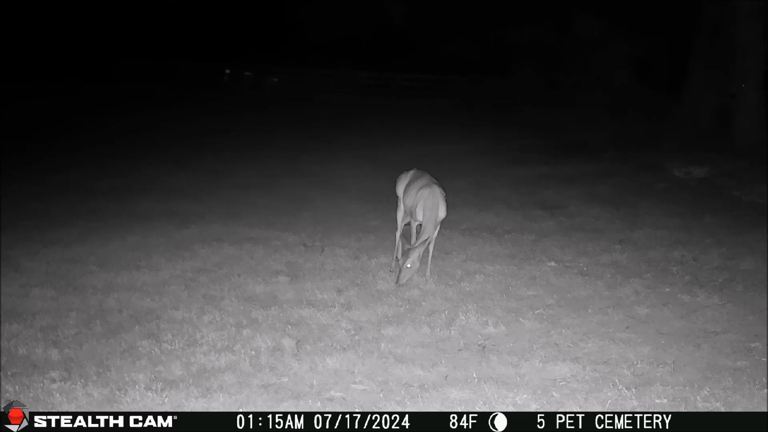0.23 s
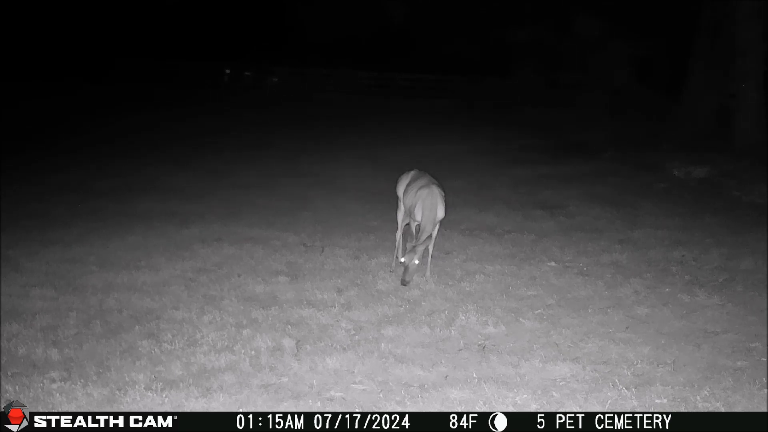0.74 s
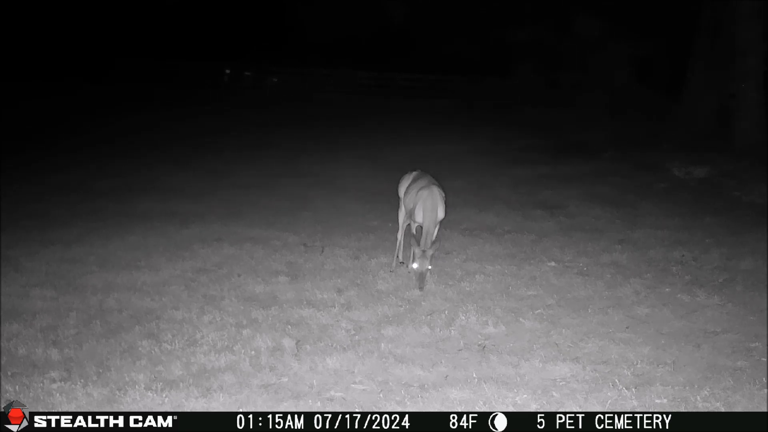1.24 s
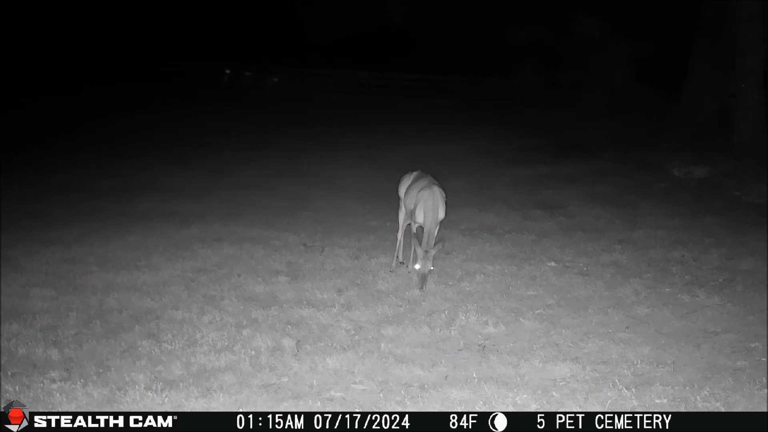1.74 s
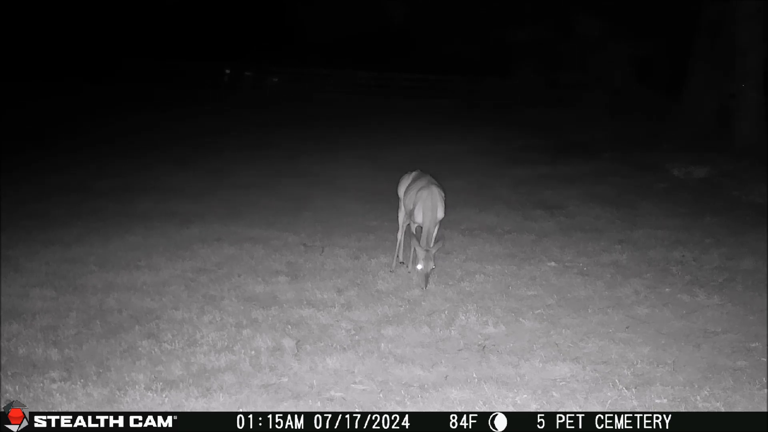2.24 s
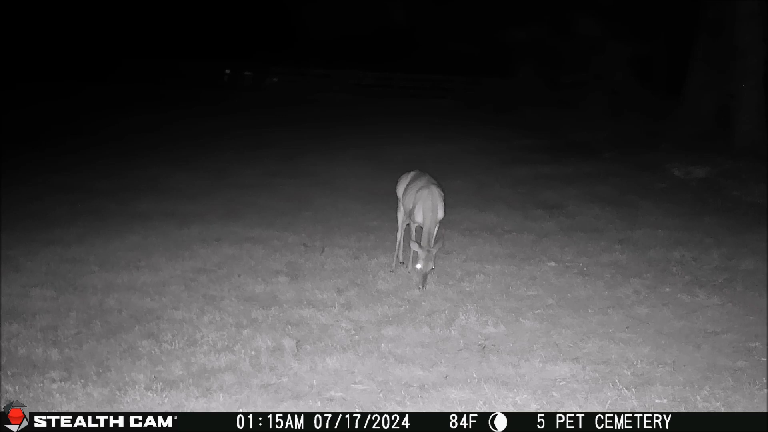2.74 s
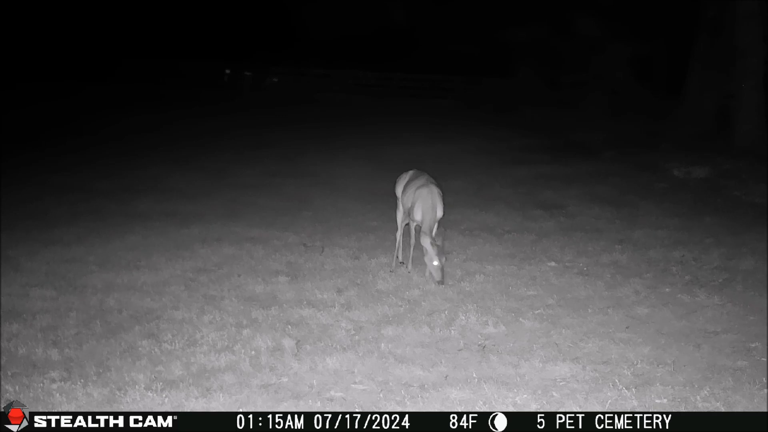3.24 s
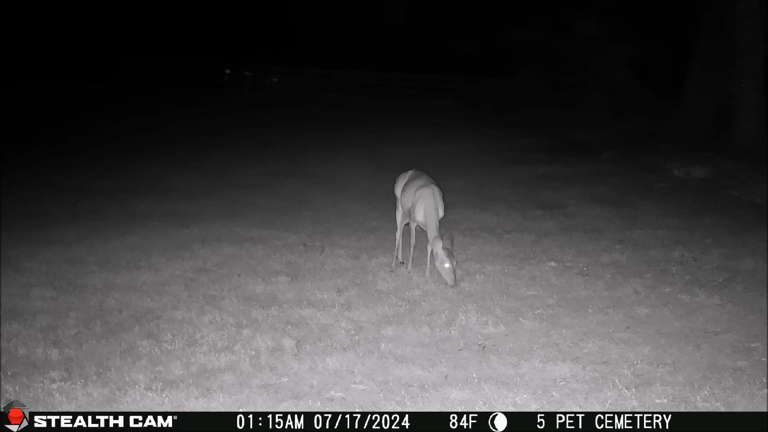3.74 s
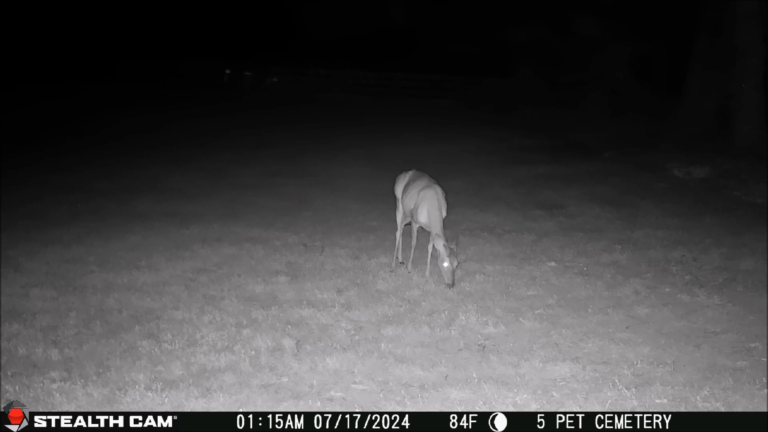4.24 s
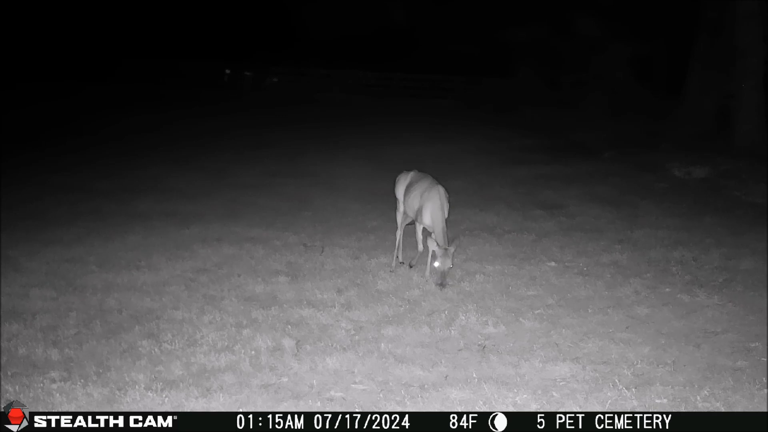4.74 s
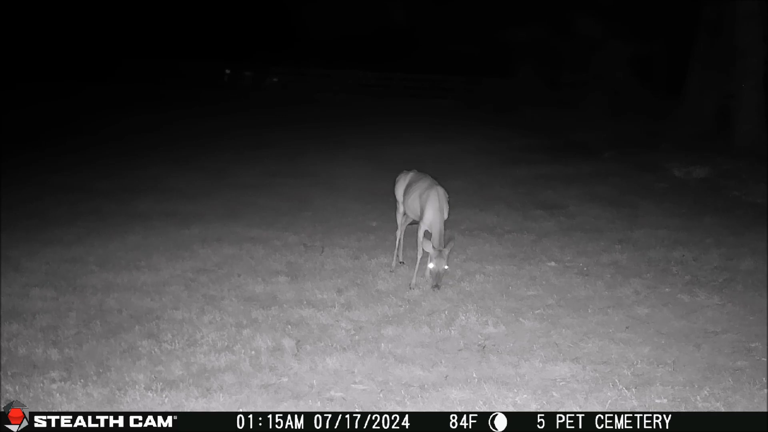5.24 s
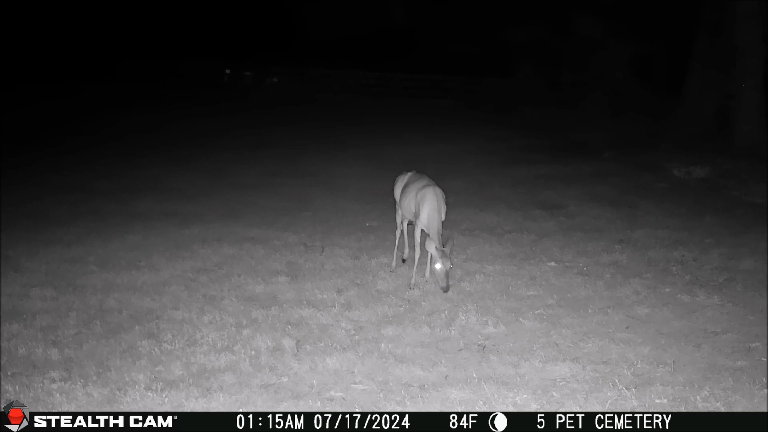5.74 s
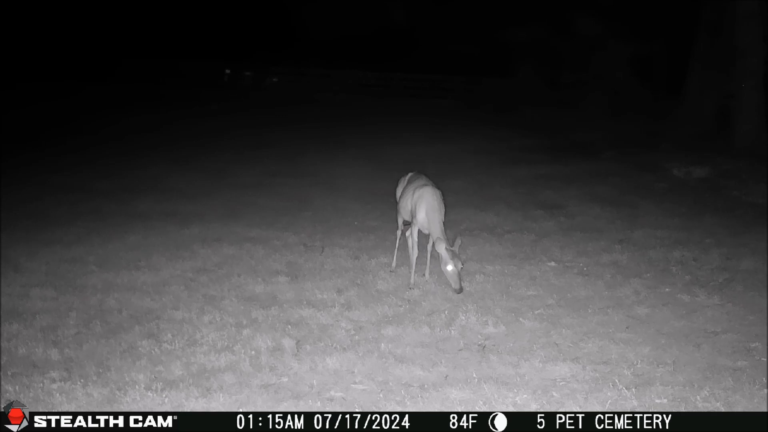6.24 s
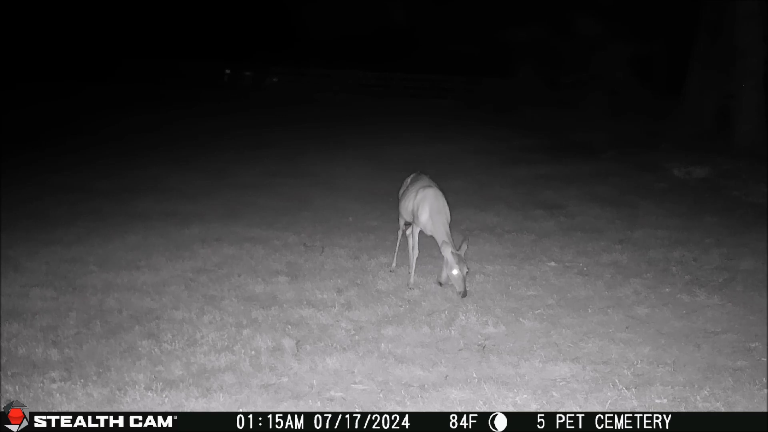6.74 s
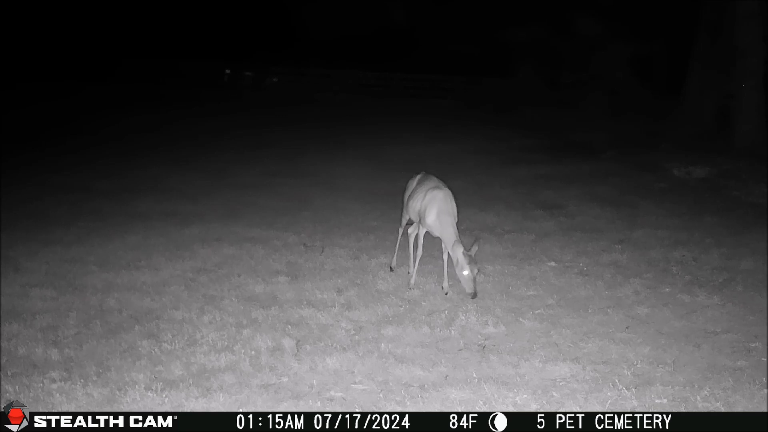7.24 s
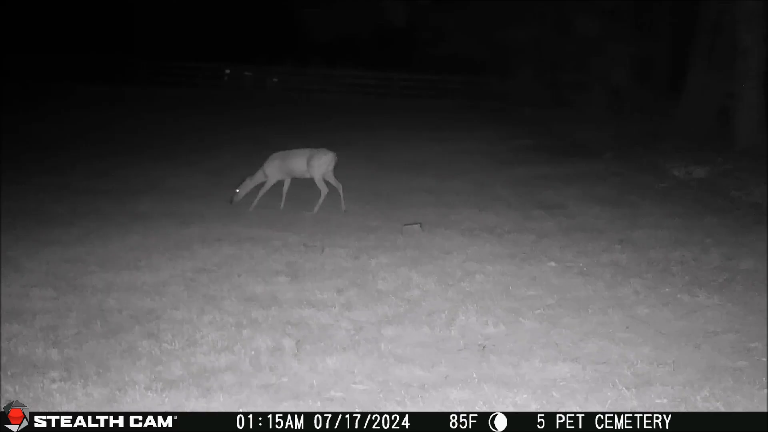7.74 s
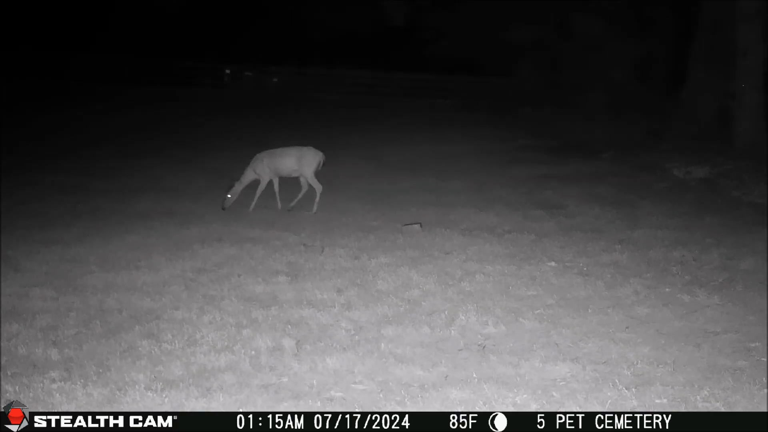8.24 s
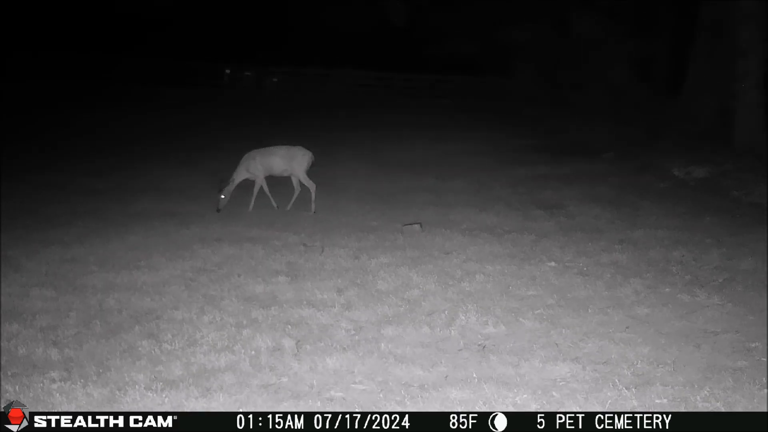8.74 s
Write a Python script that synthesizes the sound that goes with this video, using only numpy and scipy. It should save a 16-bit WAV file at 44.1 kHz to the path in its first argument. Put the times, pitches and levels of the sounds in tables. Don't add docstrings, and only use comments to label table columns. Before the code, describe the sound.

A dense night insect chorus, steady trill, surging crickets and rhythmic katydid rasps, with hiss, tiny buzzes and a soft late thump.

```python
import sys
import numpy as np
from scipy import signal
from scipy.fft import rfft, irfft
from scipy.io import wavfile
from scipy.ndimage import map_coordinates

SR = 44100
rng = np.random.default_rng(int(sys.argv[2]) if len(sys.argv) > 2 else 0)


def generate_wav(sig):
    pcm = np.round(np.clip(np.atleast_2d(sig).T, -1, 1) * 32767).astype(np.int16)
    wavfile.write(sys.argv[1], SR, pcm)


def ratio(d):
    e = np.asarray(d, float) / 20
    return 10 ** e


N = 396018


def rms_one(x):
    return x / np.sqrt(np.mean(x ** 2) + 1e-20)


def drift(rate_hz):
    knots = rng.standard_normal(400)
    return map_coordinates(knots, [np.arange(N) / SR * rate_hz + 3], order=3)


def coloured(spectrum):
    hz, db = np.transpose(spectrum)
    log_hz = np.log(np.fft.rfftfreq(N, 1 / SR) + 1)
    gain = ratio(np.interp(log_hz, np.log(hz), db, left=-99, right=-99))
    return rms_one(irfft(rfft(rng.standard_normal(N)) * gain, N))


def resonate(x, hz, width_hz):
    r = np.exp(-np.pi * width_hz / SR)
    zeros = [(1 - r * r) / 2, 0, (r * r - 1) / 2]
    poles = [1, -2 * r * np.cos(2 * np.pi * hz / SR), r * r]
    return signal.lfilter(zeros, poles, x)


def resonate_twice(x, hz, width_hz):
    return resonate(resonate(x, hz, width_hz), hz, width_hz)


def rasp(wing_modes):
    teeth_per_s = 9000
    teeth = (rng.random(N) < teeth_per_s / SR) * rng.choice([-1, 1], N)
    teeth = teeth * ratio(2.0 * rng.standard_normal(N)) + 1e-18
    out = np.zeros(N)
    for k, (hz, width_hz, db) in enumerate(wing_modes):
        sign = (-1) ** k
        out += sign * ratio(db) * rms_one(resonate_twice(teeth, hz, width_hz))
    return rms_one(out)


def phrases(rows, floor_db, sag_db_per_s, wander_db):
    attack_s, release_s = .06, .1
    t, power = np.arange(N) / SR, ratio(2 * floor_db)
    for start_s, length_s, db in rows:
        since_s = t - start_s
        rise = np.clip(since_s / attack_s + .5, 0, 1)
        fall = np.clip((length_s - since_s) / release_s + .5, 0, 1)
        held_db = db - sag_db_per_s * np.clip(since_s, 0, length_s)
        power = power + ratio(2 * held_db) * (rise * fall) ** 2
    return np.sqrt(power) * ratio(wander_db * drift(12))


def night_hiss(far_gain):
    # (frequency [Hz], density [dB per Hz])
    air = [(20, -3), (60, -6.5), (200, -10), (600, -13), (1400, -14.5), (2000, -7.5), (2600, -7), (3050, 1),
           (3500, -13.5), (4400, -3.5), (5000, -28), (5800, -25), (7000, -32), (8500, -45.5)]
    # (frequency [Hz], density [dB per Hz])
    treble = [(5500, -5), (6000, -3), (7000, -6.5), (8300, -8.5), (9000, -20), (9500, -15), (10300, -21),
              (10800, -28), (11500, -24.5), (13000, -28.5), (14200, -28.5), (15200, -23), (15700, -27),
              (15800, -37)]
    # (frequency [Hz], width [Hz], level [dB])
    whine = [(6250, 60, -84.5), (15800, 250, -110)]
    hiss = ratio(-52) * coloured(air) + ratio(-79) * coloured(treble)
    white = rng.standard_normal(N)
    for hz, width_hz, db in whine:
        hiss += ratio(db) * rms_one(far_gain ** .4 * resonate_twice(white, hz, width_hz))
    return hiss


def opposite_noise(far_gain):
    # (frequency [Hz], density [dB per Hz])
    difference = [(150, -51.5), (600, -40), (1300, -38.5), (1700, -30), (2100, -12), (2310, -2.5),
                  (2570, -13), (2990, -10), (3580, -16), (4490, -7.5), (6070, -29.5), (7900, -35.5),
                  (9400, -49), (15700, -64)]
    noise = ratio(-64.5) * rms_one(far_gain ** .25 * coloured(difference))
    return noise * np.array([[1], [-1]])


def circuit():
    # (frequency [Hz], level [dB rms])
    hum = [(50.8, -86.5), (101.6, -82), (127, -75.5), (152.4, -82), (177.8, -84)]
    # (time [s], level [dB])
    ticks = [
        (.862, -59),
        (5.592, -54),
        (7.815, -61),
    ]
    # (time [s], level [dB], decay [s], hold until drop [s], share dropped [0-1])
    thumps = [
        (7.8135, -44.0, .11, .052, .65),
    ]
    t, out = np.arange(N) / SR, np.zeros(N)
    for hz, db in hum:
        level = ratio(db + 1.6 * drift(4.5))
        out += np.sqrt(2) * level * np.sin(2 * np.pi * (hz * t + .2 * drift(2)))
    for time_s, db in ticks:
        at = round(time_s * SR)
        out[at:at + 3] += ratio(db) * np.array([-.5, 1, -.5])
    for time_s, db, decay_s, hold_s, share in thumps:
        click = 1.0 * (np.arange(N) == round(time_s * SR))
        out += ratio(db + 24) * resonate(click, 600, 300)
        since_s = t - time_s
        rise = np.clip(since_s / .0004, 0, 1)
        fall = np.clip((since_s - hold_s) / .008 + .5, 0, 1)
        out += ratio(db) * rise * (1 - share * fall) * np.exp(-np.maximum(since_s, 0) / decay_s)
    return out


def buzzes(period_s, width_s, sag_hz, ring_db, lurch_db, lurch_hz):
    # (centre [s], pulse level [dB])
    early = [(0.17, -50.5), (0.261, -51.5), (0.473, -51.5), (0.661, -52.5), (0.95, -50.2), (1.217, -51),
             (1.426, -50.5), (1.925, -50.5), (2.206, -50), (2.392, -48), (2.696, -51.1), (2.884, -52),
             (3.105, -52), (3.17, -50.5), (3.439, -51.9), (3.648, -49.7), (3.887, -51.5)]
    # (centre [s], pulse level [dB])
    late = [(4.063, -50.5), (4.204, -49), (4.426, -50.5), (4.561, -52.5), (4.616, -49), (4.771, -50),
            (4.921, -51.5), (5.105, -51), (5.251, -51), (5.396, -50.5), (5.615, -49.5), (5.95, -48),
            (6.112, -51.5), (6.216, -54), (6.426, -48), (6.585, -52.5), (6.729, -51), (7.061, -50.5),
            (7.222, -51.3), (7.393, -49), (7.539, -49.5), (7.695, -50)]
    # (centre [s], pulse level [dB])
    double = [
        (1.733, -50.1),
        (5.73, -50.5),
        (6.926, -51.6),
    ]
    pulse_count = 6
    rows = [(s, pulse_count, db) for s, db in list(early) + list(late)]
    rows += [(s, 2 * pulse_count - 1, db) for s, db in double]
    spikes, lurches = np.zeros(N), np.zeros(N)
    for (centre_s, count, db), jitter in zip(rows, rng.standard_normal((len(rows), 24))):
        k = np.arange(count)
        gap_s = period_s * (1 + .015 * jitter[-1])
        at_s = centre_s + gap_s * (k - k.mean()) + 6e-5 * jitter[k]
        at = np.round(at_s * SR).astype(int)
        spikes[at] += ratio(db + 2.2 * jitter[12 + k])
        lurches[at] += ratio(db) * jitter[k]
    lag_s = np.arange(-60, 61) / SR
    pulses = ratio(5.0) * np.convolve(spikes, np.exp(-(lag_s / width_s) ** 2), "same")
    pulses += ratio(ring_db) * resonate(pulses, 1260, 1000)
    pulses += ratio(lurch_db) * resonate(resonate(lurches + 1e-18, lurch_hz, 280), lurch_hz, 590)
    switching = ratio(-13) * resonate(spikes, 7200, 3000)
    return signal.lfilter(*signal.butter(1, sag_hz, "high", fs=SR), pulses) + switching


def frog_hoots():
    # (start [s], length [s], pitch [Hz], width [Hz], level [dB])
    calls = [
        (0.739, 0.38, 730, 70, -66.5),
        (4.959, 0.18, 733, 50, -62.5),
        (7.693, .14, 698, 60, -64),
    ]
    out = np.zeros(N)
    for start_s, length_s, hz, width_hz, db in calls:
        n, at = round(length_s * SR), round(start_s * SR)
        breath = resonate_twice(rng.standard_normal(SR // 2), hz, width_hz)[-n:]
        arch_hz = 25 * np.sin(np.linspace(0, np.pi, n))
        pitch_hz = hz + arch_hz + 12 * drift(17)[:n]
        tone = np.sqrt(2) * np.sin(2 * np.pi * np.cumsum(pitch_hz) / SR)
        out[at:at + n] += ratio(db) * np.sqrt(np.hanning(n)) * (0.42 * tone + 0.69 * rms_one(breath))
    return out


def far_katydid_gain():
    # (start [s], length [s], level [dB])
    far_rows = [(-0.05, .36, -65), (.8, 0.38, -62), (1.65, .38, -71.5), (2.15, 0.36, -69.5),
                (2.5, .5, -61.5), (3.4, 0.77, -67.5), (4.05, 0.47, -64), (4.5, 0.73, -67.5),
                (5.47, .32, -67.5), (5.88, .46, -61.5), (6.36, .24, -64), (6.83, .45, -65.5),
                (7.3, 0.54, -66.5), (8.41, 0.4, -63), (8.8, .2, -76)]
    return phrases(far_rows, floor_db=-70, sag_db_per_s=0.5, wander_db=0.43)


def far_katydids(far_gain):
    # (frequency [Hz], width [Hz], level [dB])
    far_modes = [(2970, 620, -4), (3890, 1160, 3.5), (4390, 1020, 2.5), (5097, 560, -4.5),
                 (5560, 610, -15.5)]
    return far_gain * ratio(10) * rasp(far_modes)


def ground_crickets():
    # (start [s], length [s], level [dB])
    surges = [(.04, 0.14, -51), (.7, .25, -61), (1.0, 0.15, -52), (1.65, .8, -56.5), (2.65, .2, -50.5),
              (3.5, .7, -57), (4.55, 0.58, -55), (5.45, 0.35, -54), (6.05, 0.64, -58), (6.9, 0.44, -54),
              (7.6, 0.44, -56), (8.45, 0.28, -53.5)]
    # (frequency [Hz], width [Hz], level [dB])
    ground_modes = [(4215, 550, -3.5), (4635, 366, 0)]
    gain = phrases(surges, floor_db=-56.5, sag_db_per_s=0.5, wander_db=1.0)
    return gain * ratio(-2.5) * rasp(ground_modes)


def low_katydids():
    # (start [s], length [s], level [dB])
    low_rows = [(-0.05, 0.27, -53), (.7, 0.56, -59), (1.68, 0.48, -57), (2.2, 0.39, -59), (2.47, 0.44, -56),
                (3.3, .45, -57), (3.85, 0.23, -60), (4.6, 0.56, -58), (5.17, 0.13, -57.5),
                (5.48, 0.19, -54.5), (6.15, .35, -59), (6.9, 0.54, -54), (8.2, 0.1, -56), (8.42, 0.32, -56),
                (8.87, 0.11, -61)]
    # (frequency [Hz], width [Hz], level [dB])
    low_modes = [(1842, 350, -2), (2124, 230, -4), (2540, 490, 4)]
    gain = phrases(low_rows, floor_db=-64.5, sag_db_per_s=5, wander_db=1.5)
    return gain * ratio(3.0) * rasp(low_modes)


def tree_crickets(centre_hz, spread_hz, pulse_hz, duty, count):
    # (time [s], level [dB])
    effort = [(0, -50), (.35, -46), (.9, -47), (2.0, -48), (2.8, -47), (4.2, -46.5), (5.0, -48),
              (5.25, -45.5), (5.4, -49), (5.55, -47), (7.3, -47.5), (7.42, -55.5), (7.52, -47.5),
              (8.98, -48)]
    t, out = np.arange(N) / SR, np.zeros(N)
    for place, (tempo, start, far) in zip(np.linspace(-1.6, 1.6, count), rng.random((count, 3))):
        beat = (t * pulse_hz * (.85 + .3 * tempo) + start + 0.24 * drift(6)) % 1
        stroke = np.clip(beat / duty, 0, 1)
        pitch_hz = centre_hz + spread_hz * place + 12 * drift(3) - 30 * stroke
        tone = np.sin(2 * np.pi * np.cumsum(pitch_hz) / SR)
        out += ratio(-3 * place ** 2 - 4.0 * far) * np.sin(np.pi * stroke) * tone
    return ratio(np.interp(t, *np.transpose(effort))) * rms_one(out)


def near_katydids(stroke_s):
    # (first stroke [s], strokes [count], first level [dB], growth [dB per stroke])
    songs = [(0.02, 2, -56, 3.5), (.846, 3, -54.5, 1.2), (1.65, 4, -63, 0.5), (2.17, 3, -56, 0.8),
             (2.535, 4, -49.5, 0.2), (3.075, 1, -56.5, 0), (3.375, 2, -56, 1), (3.608, 2, -52.5, .6),
             (4.125, 3, -50, -0.2), (4.653, 4, -55, .3), (5.59, 2, -53.5, -4), (6.03, 2, -53, 0),
             (6.279, 3, -48, -1.8), (6.92, 1, -58, 0), (7.04, 3, -51.5, -2), (7.75, 1, -61, 0),
             (8.178, 1, -64, 0), (8.45, 3, -53, 0.7), (8.914, 1, -65, 0)]
    # (frequency [Hz], width [Hz], level [dB])
    near_modes = [(2854, 170, -3.5), (3030, 230, -0.5), (3520, 760, -6.5), (4220, 390, -8),
                  (5060, 990, -15.5)]
    gap_s, gap_jitter_s, jitter_db = .116, .003, .4
    t, power = np.arange(N) / SR, np.zeros(N)
    chances = rng.standard_normal((len(songs), 2, 4))
    for (first_s, strokes, first_db, growth_db), chance in zip(songs, chances):
        for k in range(round(strokes)):
            at_s = first_s + gap_s * k + gap_jitter_s * chance[0, k]
            db = first_db + growth_db * k + jitter_db * chance[1, k]
            near = slice(max(round((at_s - .15) * SR), 0), round((at_s + .15) * SR))
            power[near] += ratio(2 * db) * np.exp(-((t[near] - at_s) / stroke_s) ** 2)
    return ratio(3.0) * np.sqrt(power) * rasp(near_modes)


def scene():
    far_gain = far_katydid_gain()
    mono = night_hiss(far_gain) + circuit()
    mono += buzzes(period_s=0.001977, width_s=0.00017, sag_hz=149, ring_db=-5.0, lurch_db=29, lurch_hz=169)
    mono += frog_hoots()
    mono += far_katydids(far_gain) + ground_crickets() + low_katydids()
    mono += tree_crickets(centre_hz=2320, spread_hz=60, pulse_hz=47.86, duty=.7, count=22)
    mono += near_katydids(stroke_s=0.025)
    return mono + opposite_noise(far_gain)


def band_limit(x):
    return signal.sosfilt(signal.butter(12, 15730, fs=SR, output="sos"), x)


def record(dry):
    return band_limit(dry)


dry = scene()
out = record(dry)
generate_wav(out)
```